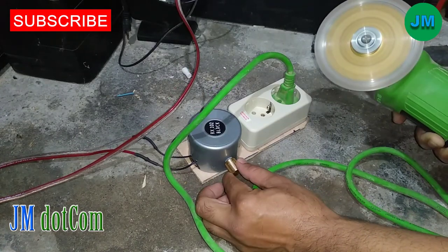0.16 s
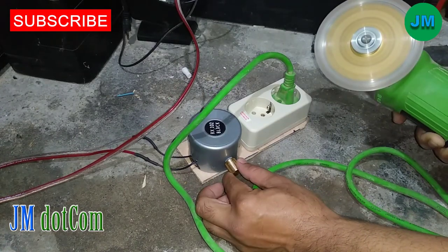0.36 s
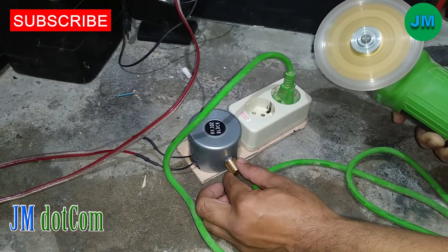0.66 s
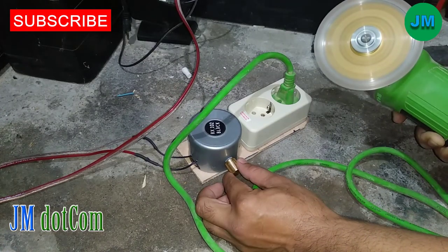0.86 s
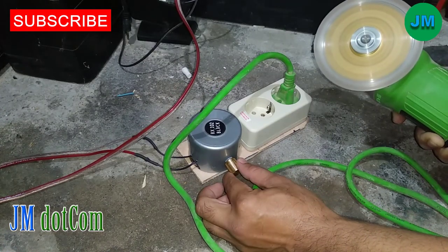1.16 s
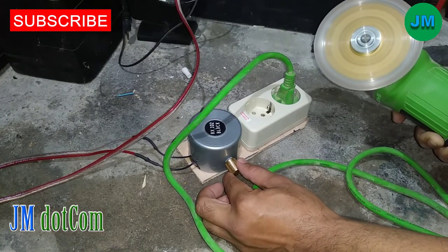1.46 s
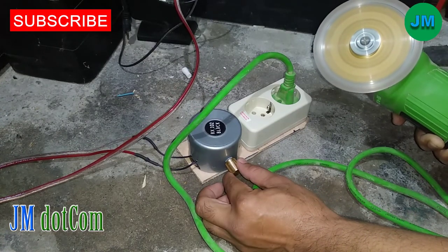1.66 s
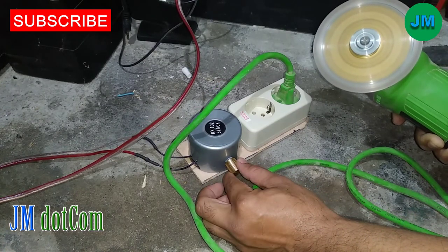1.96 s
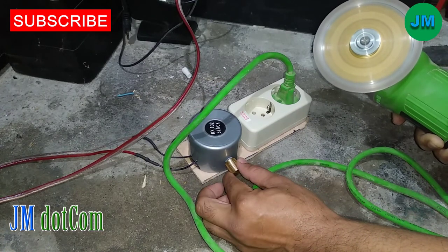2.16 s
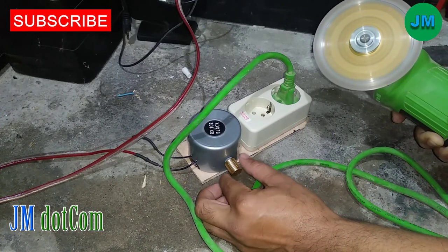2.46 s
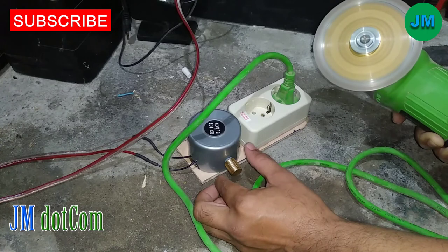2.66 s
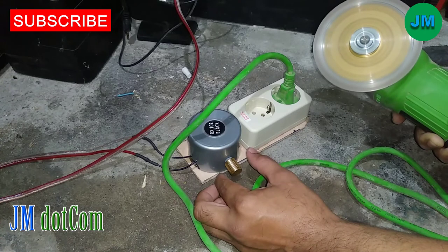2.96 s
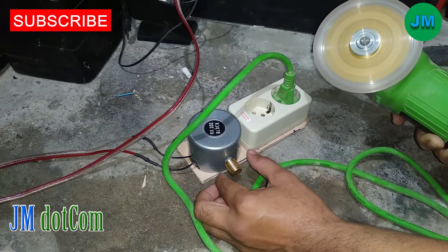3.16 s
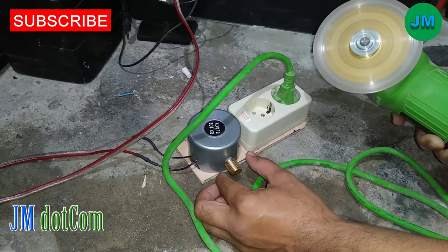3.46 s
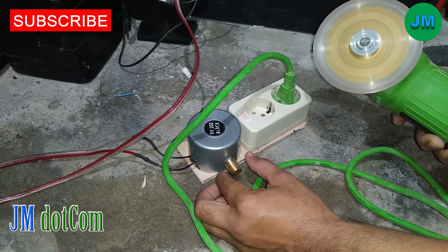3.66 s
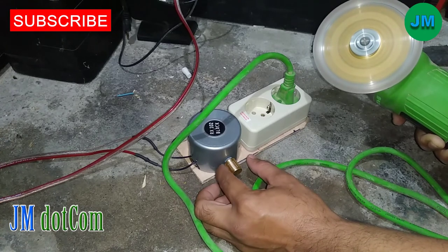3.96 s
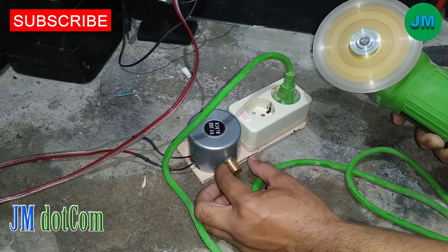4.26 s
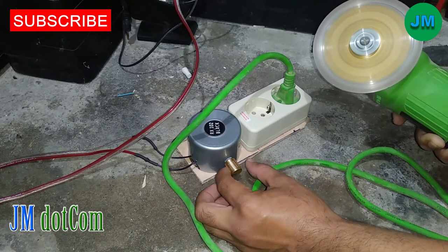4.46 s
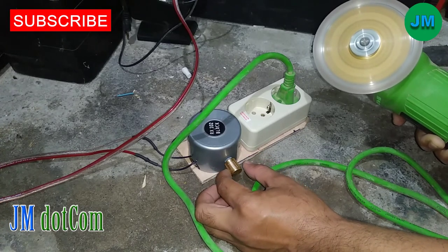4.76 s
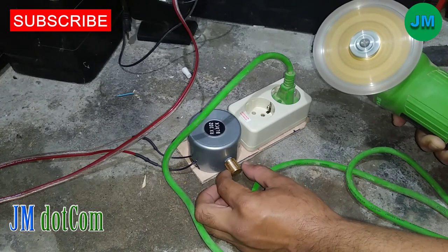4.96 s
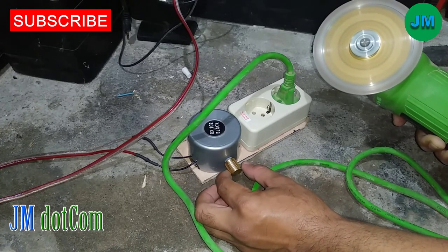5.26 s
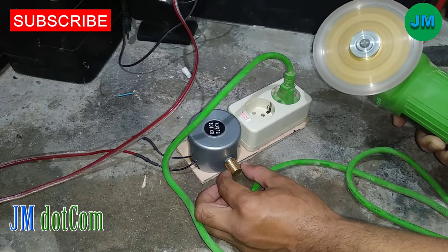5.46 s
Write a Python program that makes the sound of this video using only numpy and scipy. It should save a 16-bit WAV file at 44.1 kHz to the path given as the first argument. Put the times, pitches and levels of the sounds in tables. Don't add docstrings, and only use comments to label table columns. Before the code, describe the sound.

A free-running angle grinder is heard close up throughout, already spinning at 0 s and still running at the end, about 5.6 s. Its first moments are slightly thinner; around 0.43 s the tone turns brighter and harder as another side of the tool faces the microphone. Speed rises until about 0.9 s, dips near 1.1 s, rises to 1.5 s, then sags to its lowest pitch near 2.1 s. Metallic gear rattles come in dense, uneven bursts from 0.4 to 1.5 s, easing as the motor coasts, and return around 2.1-3.1 s. From 2.2 s the whine climbs strongly, levelling after 3.5 s into a fast, high, steadier whir with only scattered clacks near 4.3, 4.5, 5.2 and 5.5 s. Airy vent hiss grows with speed, and faint low puffs bump the microphone, the strongest near 4 s. The concrete gives a tight, single short reflection; there is little bass.

```python
import sys
import numpy as np
from scipy import signal
from scipy.fft import rfft, irfft, next_fast_len
from scipy.io import wavfile
from scipy.ndimage import uniform_filter1d, map_coordinates

SR = 44100
rng = np.random.default_rng(int(sys.argv[2]) if len(sys.argv) > 2 else 0)


def digitize_waveform(pressure):
    field = np.atleast_2d(pressure).T
    bounded = np.clip(field, -1, 1)
    quanta = np.round(bounded * 32767).astype(np.int16)
    wavfile.write(sys.argv[1], SR, quanta)


def attenuation_scalar(level_db):
    decades = np.asarray(level_db, float) / 20
    return 10 ** decades


N = 246519

MAINS_HZ = 50.11
TURN_S = 0.43
ECHO_S, ECHO_FIRST_S = 0.001354, 0.001475
INERTIA_S = 0.105

# time in seconds, speed in rev/s.
ARMATURE_SPEED = [(0.0, 206.0), (0.09, 211.3), (0.33, 233.3), (0.59, 236.6), (0.85, 240.7), (1.12, 222.3),
                  (1.24, 226.8), (1.51, 256.1), (1.71, 238.9), (1.97, 211.0), (2.14, 200.5), (2.32, 209.5),
                  (2.53, 238.8), (2.78, 261.3), (3.28, 295.4), (3.6, 305.4), (5.02, 315.0), (5.59, 315.4)]
# time in seconds, pull in dB, disc over the pull in dB.
MOTOR_PULL = [(0, -23.5, 6.5), (.22, -27.5, 12), (.42, -26, 8), (.86, -23.5, 1.5), (.96, -29, 5),
              (1.15, -28.5, 3.5), (1.2, -24.5, 7.5), (1.52, -22, 1.5), (1.68, -27.5, 5), (2.1, -29.5, 4.5),
              (2.19, -32, 3), (2.22, -24.5, 6.5), (2.4, -21.5, 7.5), (2.7, -23.5, 4), (3.3, -20.5, 3),
              (4.2, -22, 4.5), (5.2, -21.5, 4), (5.59, -23, 6.5)]
# start in seconds, disc peak in dB, housing over the disc in dB.
HARD_BURSTS = [(0.1072, -21, 8), (0.429, -5.5, -27), (0.4666, -5.5, -3.5), (0.505, -9, 0),
               (0.606, -5.5, -2.5), (0.653, -7, -10), (0.707, -3, -23), (0.79, -13.5, 4.5),
               (0.83, -4.5, -9), (1.0096, -6, 0.5), (1.071, -6.5, -2), (1.1914, -6.5, -3),
               (1.2404, -7.5, -0.5), (1.2765, -6, -10), (1.3895, -5.5, -18), (1.4814, -6, 1),
               (2.128, -2.5, -4), (2.1964, -5, -2), (2.2692, -5, -15), (2.3724, -11, -15),
               (2.4119, -10, -14), (2.592, -9.5, -4), (2.7087, -5, -18), (2.8489, -4.5, -4.5),
               (2.929, -5.5, -15), (3.0789, -8, -19), (4.259, -4.5, -6), (4.4737, -6, -15),
               (5.1657, -7, -21), (5.4937, -3.5, -13)]
# centre in Hz, width in Hz, level in dB.
HOUSING_MODES = [(773, 34, -15.5), (991, 50, -13), (1316, 17, -14.5), (1685, 31, -5), (1978, 17, -7),
                 (2517, 44, -5), (2795, 31, -1.5), (3195, 34, 1.5), (3258, 98, -0.5), (3769, 43, -3.5),
                 (4074, 26, 2), (4694, 74, -7)]
# centre in Hz, width in Hz, level in dB.
HOUSING_FIRST_MODES = [(770, 104, -24.5), (1326, 27, -17.5), (2370, 15, -6), (2805, 36, -0.5),
                       (3600, 17, -16), (4270, 18, -17)]
# centre in Hz, width in Hz, level in dB.
DISC_MODES = [(6120, 18, -3), (6760, 65, 3), (7920, 64, 1), (7524, 44, 11.0), (8080, 290, 2.5),
              (8764, 274, 5.0), (9140, 91, 1), (10070, 84, -2), (10824, 45, 5.5), (11480, 46, 12.0),
              (13100, 210, -10), (8900, 770, 1), (10610, 660, -1.0), (6252, 74, 11.5)]
# centre in Hz, width in Hz, level in dB.
GUARD_MODES = [(1664, 120, -10), (3212, 88, 1), (3286, 80, 0)]
# frequency in Hz, density in dB per Hz.
HUM_COLOUR = [(15, -85), (25, -41), (266, -11), (304, -3.5), (526, -3.5), (753, -17), (945, -0.5),
              (1160, -11.5), (1610, -5.5), (2300, -2.5), (2990, -5), (5060, -120)]
# frequency in Hz, density in dB per Hz.
CASING_COLOUR = [(1180, -69), (2000, -25), (2610, -10), (3220, 1), (3440, 6), (5200, -3), (6760, -45),
                 (11400, -120)]
# frequency in Hz, density in dB per Hz.
FAN_COLOUR = [(880, -14), (1500, -6), (1850, -6.5), (2590, -26), (4100, -19.5), (4950, 0), (5810, 4),
              (7450, 6.5), (8640, -5.5), (13800, -1.5), (16200, -8)]
# frequency in Hz, level in dB.
SHAFT_TONE = [(205, -65), (233, -57), (247, -52), (266, -61), (295, -48), (315, -51.5)]
# frequency in Hz, level in dB.
SLOT_TONE = [(2480, -39), (2680, -38.5), (2830, -27.5), (3200, -26), (3370, -42), (3520, -20), (3680, -33),
             (3780, -28)]
# frequency in Hz, level in dB.
BAR_TONE = [(4850, -36), (5100, -34.5), (5900, -27), (6200, -21), (6450, -36.5), (6830, -20.5),
            (7150, -29.5), (7380, -22.5)]
# start in seconds, peak in dB.
AIR_PUFFS = [(0.598, -37), (0.818, -45), (1.384, -34), (2.261, -31), (2.913, -34), (3.329, -34.5),
             (4.024, -26.5), (4.362, -34), (4.679, -56), (5.165, -35), (5.509, -34)]
# frequency in Hz, density in dB per Hz.
PUFF_COLOUR = [(30, -50), (100, -20), (150, -6.5), (250, -14.5), (500, -21)]
# frequency in Hz, left-right likeness from 0 to 1.
LEFT_RIGHT_LIKENESS = [(60, .75), (200, 0.97), (700, 0.96), (2400, 0.87), (4300, 0.91), (4900, 0.13),
                       (8000, 0.46), (11000, 0.73), (15000, 0.17)]
# frequency in Hz, left over right in dB.
CAPSULE_BALANCE = [(60, 3), (130, -1), (290, -3), (640, -3), (1410, -3.5), (3100, -3.5), (6820, -2.5),
                   (15000, -6)]


def unit(x):
    return x / np.sqrt(np.mean(x ** 2) + 1e-20)


def along(points, hz):
    f, v = np.transpose(points)
    return np.interp(np.log(hz + 1), np.log(f + 1), v)


def curves(rows):
    s, *cols = np.transpose(rows)
    return [np.interp(np.arange(N) / SR, s, c) for c in cols]


def wobble(rate):
    knots = rng.standard_normal(int(N * rate / SR) + 4)
    return map_coordinates(knots, [np.arange(N) * rate / SR])


def filtered(x, response):
    m = next_fast_len(N + 8192)
    return irfft(rfft(x, m) * response(np.fft.rfftfreq(m, 1 / SR)), m)[..., :N]


def modes(table, f):
    return sum(attenuation_scalar(db) * 1j * f * w / (c * c - f * f + 1j * f * w) for c, w, db in table)


def patchy(pair, depth_db):
    z = signal.stft(pair, nperseg=512)[2]
    field = uniform_filter1d(rng.standard_normal(z.shape[1:]), size=5, axis=0)
    field = uniform_filter1d(field, size=6, axis=1)
    flickering = z * attenuation_scalar(depth_db * unit(field))
    return unit(signal.istft(flickering, nperseg=512)[1][:, :N])


def stereo(pair):
    def mid_and_side(hz):
        angle = np.arccos(np.clip(along(LEFT_RIGHT_LIKENESS, hz), -1, 1)) / 2
        return np.array([np.cos(angle), np.sin(angle)])
    mid, side = filtered(pair, mid_and_side)
    return np.array([mid + side, mid - side])


def floor_echo(delay, f, share=0.61, fade_hz=6000):
    return 1 + share * np.exp(-f / fade_hz) * np.exp(-2j * np.pi * f * delay)


def turned(x, first, later):
    side = np.clip((np.arange(N) / SR - TURN_S) / 0.013 + 0.5, 0, 1)
    hz = np.linspace(1, SR / 2, 8192)

    def rms(body):
        return np.sqrt(np.mean(np.abs(body(hz)) ** 2))
    before = filtered(x * np.sqrt(1 - side), first) / rms(first)
    return before + filtered(x * np.sqrt(side), later) / rms(later)


def unrest(speed):
    coasting = np.clip((-np.gradient(speed) * SR - 35) / (75 - 35), 0, 1)
    full = np.clip((speed - 255) / (300 - 255), 0, 1)
    return 1 - 0.4 * np.maximum(full, coasting)


def teeth(scatter_db, kick_db):
    kick = np.cos(2 * np.pi * MAINS_HZ * np.arange(N) / SR + 2.36 * wobble(6))
    contacts = patchy(rng.standard_normal((2, N)), depth_db=3)
    return unit(contacts * attenuation_scalar(scatter_db * wobble(350) + kick_db * kick))


def bursts(pull_db, rough):
    first_kick_s, peak_s, half_s = 0.016, 0.0068, 0.0095
    kick_db, scatter_db, colour_db = -5.5, 4, 3
    marks = np.zeros((2, N))
    kicks = np.round(np.arange(first_kick_s, N / SR - 0.01, 1 / MAINS_HZ) * SR).astype(int)
    size, colour = rng.uniform(-1.7, 1.7, (300, 2))[:len(kicks)].T
    soft_db = pull_db[:, kicks] + kick_db + scatter_db * rough[kicks] * size
    marks[:, kicks] = attenuation_scalar(soft_db + colour_db * colour * [[1], [-1]])
    for s, db, low_db in HARD_BURSTS:
        marks[:, round((s + peak_s) * SR)] = attenuation_scalar(db + low_db - 10.5), attenuation_scalar(db - 9.0)
    t = np.arange(-SR // 20, SR // 20 + 1) / SR
    bump = np.exp(-2 * (t[None] / half_s) ** 2)
    return np.sqrt(np.abs(signal.fftconvolve(marks ** 2, bump, "same", axes=1)))


def gears(speed):
    housing_db, facing_db = curves(MOTOR_PULL)
    disc_db = housing_db + facing_db
    hum_db = -31.5 + 0.067 * (housing_db + 22)
    rough = unrest(speed)
    low, high = bursts(np.array([housing_db, disc_db - 1.5]), rough)
    shake_db = 0.82 * rough * wobble(22.35)

    def casing(f):
        return attenuation_scalar(along(CASING_COLOUR, f) - 17.0)

    def first_side(f):
        return (modes(HOUSING_FIRST_MODES, f) + casing(f)) * floor_echo(ECHO_FIRST_S, f)

    def later_side(f):
        return (modes(HOUSING_MODES, f) + casing(f)) * floor_echo(ECHO_S, f)

    def ring(f):
        return modes(DISC_MODES, f) * f ** 2 / (f ** 2 + 5000 ** 2)

    def steel(f):
        return modes(GUARD_MODES, f) ** 2

    def drone(delay):
        return lambda f: attenuation_scalar(along(HUM_COLOUR, f)) * floor_echo(delay, f, share=0.29)

    mesh = attenuation_scalar(housing_db + shake_db)
    housing = turned(teeth(1.46, 0.48) * np.hypot(mesh, low), first_side, later_side)
    disc = turned(teeth(1.6, 0.83) * np.hypot(attenuation_scalar(disc_db - 3 + shake_db), high), ring, ring)
    hum_force = teeth(1, 0.57) * attenuation_scalar(hum_db - 8 + 2.75 * shake_db)
    hum = turned(hum_force, drone(ECHO_FIRST_S), drone(ECHO_S))
    buzz = attenuation_scalar(-1 - 37 * (1 - rough)) * np.hypot(mesh, 0.7 * low) * (np.arange(N) / SR > TURN_S)
    guard = turned(teeth(3.9, 0.88) * buzz, first_side, steel)
    return stereo(housing + guard + disc + hum)


def fan(speed):
    noise = patchy(rng.standard_normal((2, N)), depth_db=4)
    air = unit(filtered(noise, lambda f: attenuation_scalar(along(FAN_COLOUR, f))))
    return stereo(air * attenuation_scalar(-28.5 + 20.0 * np.log10(speed / 220) + wobble(19)))


def whine(speed):
    slot_count, bar_count = 12, 24
    turns = np.cumsum(speed * (1 + 0.001085 * wobble(30))) / SR
    chop = 1 + 0.43 * np.cos(2 * np.pi * MAINS_HZ * np.arange(N) / SR + wobble(4.83))
    rough = unrest(speed)

    def line(order, db, blur, lag):
        level = attenuation_scalar(db + 4.5 + 7.6 * rough * np.tanh(wobble(20)))
        phase = 2 * np.pi * order * turns + blur * rough * wobble(120)
        return level * np.sin(phase + np.array([[lag], [-lag]]))

    shaft = line(0.99, along(SHAFT_TONE, speed), 0.64, 0.055)
    slots = line(slot_count, along(SLOT_TONE, slot_count * speed) - 3, 0.5, 0.1)
    bar_db = along(BAR_TONE, bar_count * speed)
    bars = line(bar_count, bar_db - 2, 1.5, 0.6) + line(2 * bar_count, bar_db - 15, 3.5, 0.5)
    slowing = -uniform_filter1d(np.gradient(speed) * SR, size=4000)
    coasting = np.clip(slowing / 90, 0, 1) * (speed / 250) ** 9
    bearing = coasting * line(6.9, -34.0, 0.29, 0.26)
    return shaft + bearing + chop * (slots + bars)


def puffs():
    t = np.arange(N) / SR
    swell = sum(attenuation_scalar(db + 1) * np.exp(-((t - s - 0.012) / 0.011) ** 2) for s, db in AIR_PUFFS)
    rumble = filtered(rng.standard_normal((2, N)), lambda f: attenuation_scalar(along(PUFF_COLOUR, f)))
    return swell * stereo(unit(rumble))


def scene():
    speed = uniform_filter1d(curves(ARMATURE_SPEED)[0], size=round(INERTIA_S * SR), mode="nearest")
    return gears(speed) + fan(speed) + whine(speed) + puffs()


def band_limit(x):
    return signal.sosfilt(signal.butter(12, 15900, fs=SR, output="sos"), x)


def record(dry):
    ceiling = 0.7
    held = dry / (1 + np.abs(dry / ceiling) ** 6) ** (1 / 6)

    def capsules(f):
        bass_cut = (f ** 2 / (f ** 2 + 130 ** 2)) ** 1.5
        return bass_cut * attenuation_scalar(along(CAPSULE_BALANCE, f) / 2 * np.array([[1], [-1]]))
    return band_limit(filtered(held, capsules))


dry = scene()
out = record(dry)
digitize_waveform(out)
```